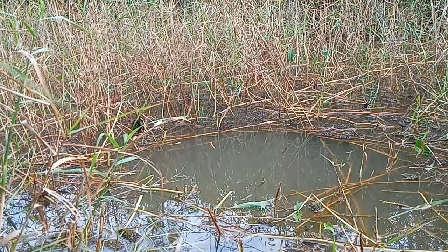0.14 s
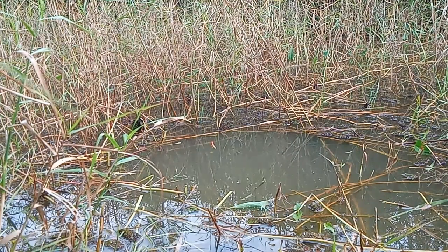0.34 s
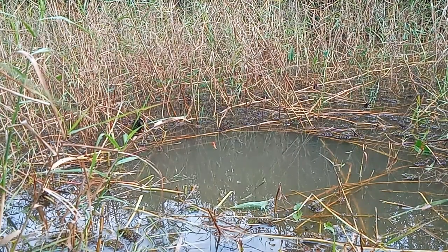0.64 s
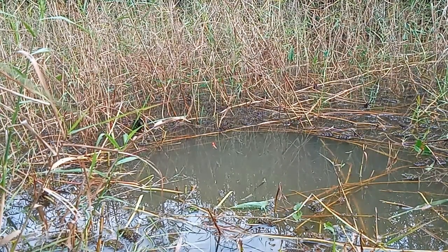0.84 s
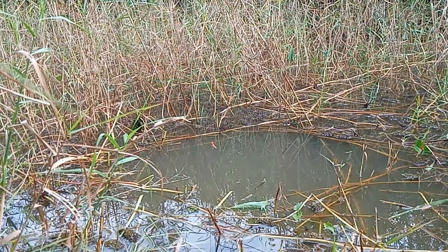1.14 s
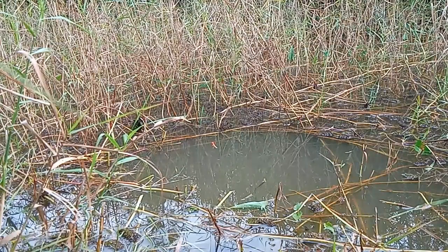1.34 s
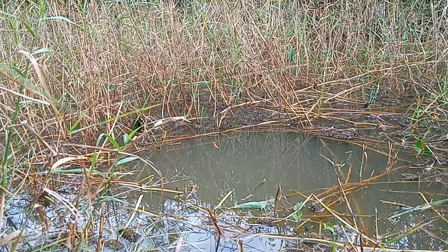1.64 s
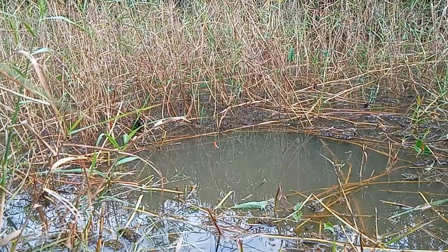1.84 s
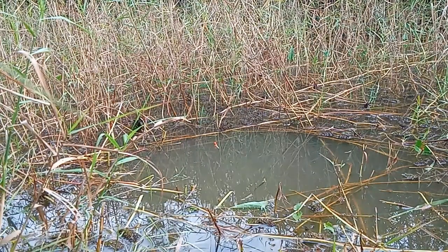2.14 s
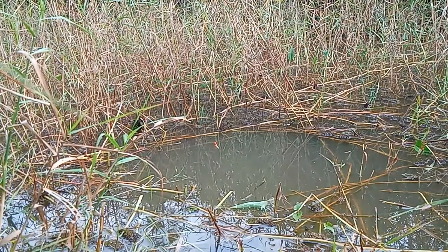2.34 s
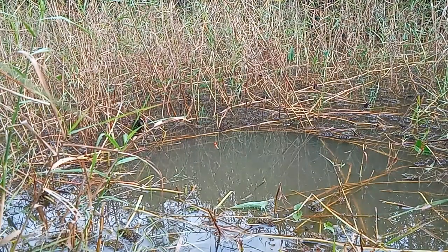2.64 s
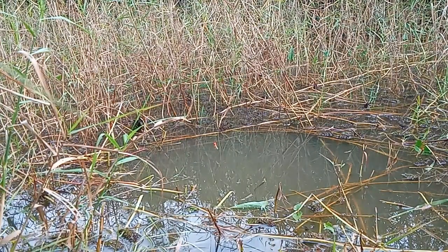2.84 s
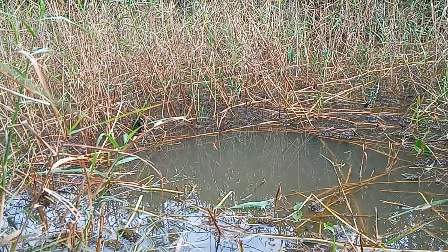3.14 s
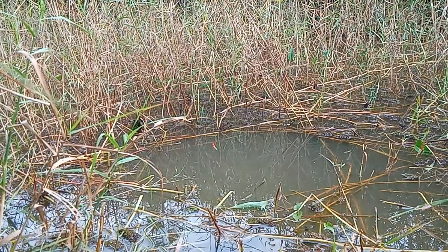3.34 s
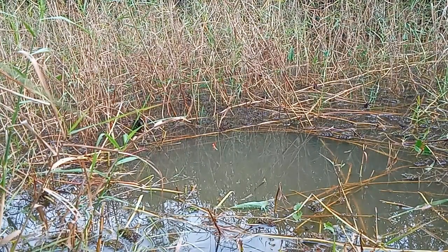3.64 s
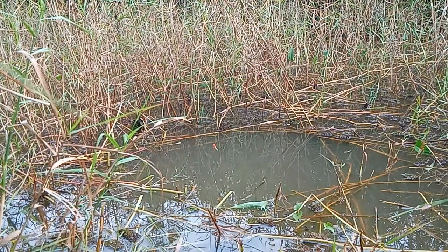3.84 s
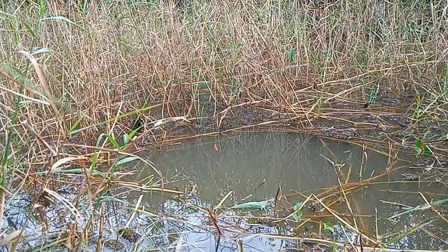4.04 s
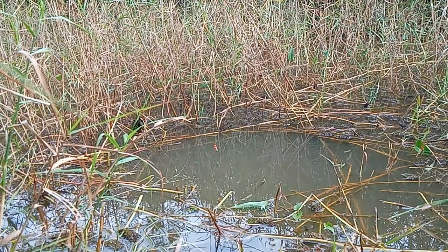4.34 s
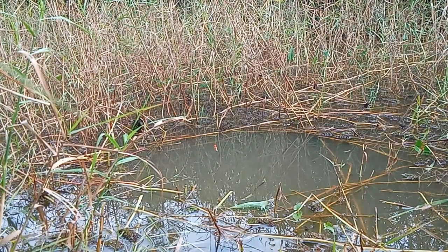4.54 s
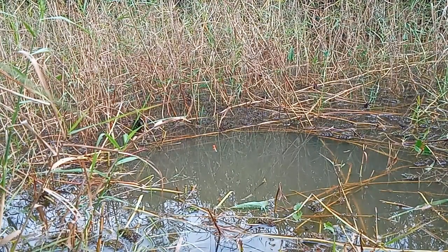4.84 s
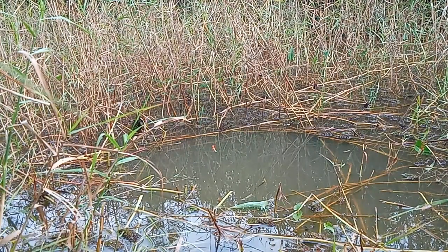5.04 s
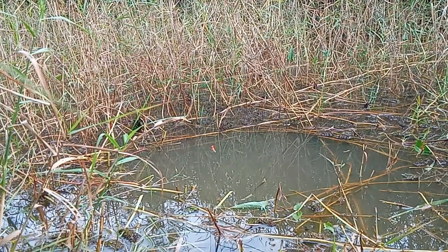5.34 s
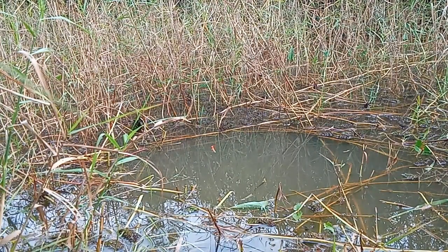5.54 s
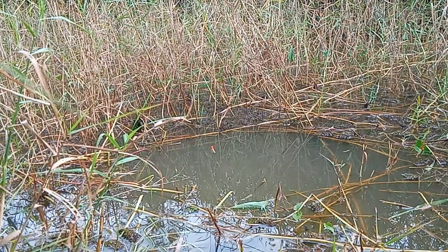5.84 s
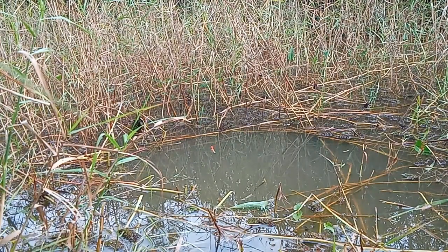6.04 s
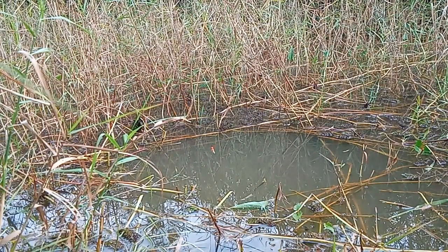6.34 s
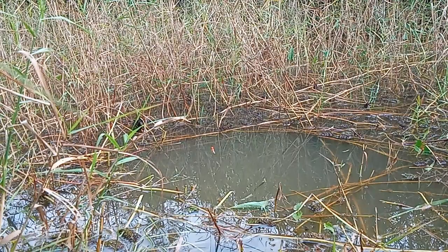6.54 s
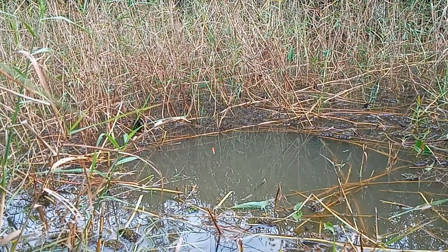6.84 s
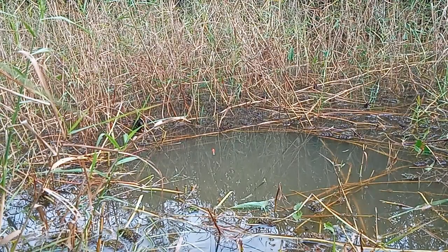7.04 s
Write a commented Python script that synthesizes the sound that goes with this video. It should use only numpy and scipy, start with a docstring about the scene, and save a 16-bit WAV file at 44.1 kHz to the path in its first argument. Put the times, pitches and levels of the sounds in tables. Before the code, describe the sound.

A natural pond-side ambience among dry reeds, lasting about seven seconds. Low wind rumbles and buffets the microphone from the start, with uneven gusts and soft thumps near 0.7, 1.3, 2.1 and 2.8 s, then eases after about 4.5 s. Above it hangs a constant, very high insect chorus: rapid pulsing chirps, trills repeating about once a second, and a lower cricket stepping up in pitch. A dry bush-cricket buzz grows from 1.6 s, cuts off near 3.25 s and returns gradually from 4.8 s to the end. Leaves rustle and dry stems tick in the first 0.4 s, with lighter rustles near 3.4 and 5 s. Faint hoots sound at 0.7-1.2 s. A near bird gives loud, short falling calls at 0.85, 1.05 and 1.2 s, then at 5.85 and 6.5 s. Rough little chips scatter between, busiest from 3.8 to 5.3 s, over faint echoing bird chatter.

```python
"""From the start, a light wind of shaped noise rumbles and later eases, over open air and a far insect chorus.
A bush cricket buzzes in fast falling sweeps; other crickets chirp and trill as pulsed tones, each at its pitch.
Birds chatter faintly in gliding whistles, leaves rustle as flickering noise, and dry stems tick as dying tones.
A third of a second in, single bird chips and a cricket that steps up in pitch join.
Soft thumps, a few far hoots and a near bird's loud, falling calls follow before the first second is over."""
import sys
import numpy as np
from scipy import signal
from scipy.fft import rfft, irfft, next_fast_len
from scipy.io import wavfile
from scipy.ndimage import uniform_filter1d

SR = 44100
rng = np.random.default_rng(int(sys.argv[2]) if len(sys.argv) > 2 else 0)


def dump_mix(stems):
    """Bounce the given channels to the path in sys.argv[1] as a 16-bit WAV at rate SR."""
    frames = np.atleast_2d(stems).T  # one column per channel
    limited = np.clip(frames, -1, 1)  # hard clip at full scale
    pcm = np.round(limited * 32767).astype(np.int16)
    wavfile.write(sys.argv[1], SR, pcm)


N = 317634
TIME = np.arange(N) / SR


def gain_of(db):
    """Turns decibels into a multiplier for the sound."""
    return 10 ** (np.asarray(db) / 20)


def evened(x):
    """Scales a sound so its average strength (rms) is 1."""
    return x / np.sqrt(np.mean(x ** 2) + 1e-20)


def level(curve):
    """Joins (time [s], level [dB]) points into a gain for every sample."""
    return gain_of(np.interp(TIME, *np.transpose(curve)))


def add(mix, s, sound):
    """Mixes a sound in at time s."""
    part = mix[max(round(s * SR), 0):][:len(sound)]
    part += sound[:len(part)]


def noise(spectrum):
    """Hiss of rms 1, made stronger or weaker at each pitch by (frequency [Hz], level [dB]) points."""
    f, db = np.transpose(spectrum)
    log_hz = np.log(np.fft.rfftfreq(N, 1 / SR) + 1)  # the 1 avoids log of zero
    shape = np.interp(log_hz, np.log(f), db, left=-60, right=-120)
    return evened(irfft(rfft(rng.standard_normal(N)) * gain_of(shape), N))


def drift(hz, size=N):
    """Smooth random wandering of rms 1, moving up to about hz times a second."""
    n = next_fast_len(size + 8192)
    f = np.fft.rfftfreq(n, 1 / SR)
    slowed = rfft(rng.standard_normal(n)) / (1 + (f / hz) ** 4)
    return evened(irfft(slowed, n))[:size]


def scatter(x, t60, wet_db):
    """Sound arrives directly and by many faint reflections off stems and banks, dying 60 dB in t60 s."""
    t = np.arange(int(1.2 * t60 * SR) + 200) / SR
    arrivals = rng.random(len(t)) < 3000 / SR  # about 3000 reflections per second
    taps = rng.standard_normal(len(t)) * arrivals * gain_of(-60 * t / t60)
    reflected = signal.oaconvolve(x, taps / np.linalg.norm(taps))[:N]
    wet = gain_of(wet_db)
    return (x + wet * reflected) / np.hypot(1, wet)


def strokes(turns, hz, fall, duty):
    """Each wing stroke rings a tone that sags in pitch as the file slows."""
    u = np.minimum(turns % 1 / np.clip(duty, .1, 1), 1)  # 0 to 1 through the stroke, then a rest
    pitch = hz * (1 - fall * (u - .5))
    tone = np.sin(2 * np.pi * np.cumsum(pitch) / SR)
    return evened(np.sin(np.pi * u) * tone)


# The breeze: (time [s], level before gusts, wavering and a small trim [dB])
BREEZE_LEVEL = [(0, -31), (.22, -41.5), (.36, -26), (.62, -28), (1.08, -35.5), (1.3, -29), (1.9, -28),
                (2.28, -28), (2.42, -39), (2.55, -29.5), (3.2, -29.5), (3.7, -32.5), (4.02, -39.5),
                (4.3, -31.5), (4.65, -44.5), (5, -38), (5.35, -45.5), (5.7, -37), (7.2, -39.5)]
# Tone of the buffeting: (frequency [Hz], relative level per Hz [dB])
BUFFET_TONE = [(20, -30), (32, -30.5), (50, -8.5), (65, -3.5), (90, 0.5), (130, -2), (190, -9),
               (280, -22.5), (400, -40), (700, -67)]
# Gusts on top of the breeze: (time of crest [s], length [s], level before a small trim [dB])
GUST_SWELLS = [(0.832, 0.044, -34), (1.224, .07, -21.5), (1.368, 0.16, -22.5), (1.536, 0.16, -24.5),
               (1.806, .08, -21), (1.92, .06, -25), (2.07, 0.17, -23.5), (2.77, 0.17, -19.5),
               (2.905, 0.042, -21), (4.16, 0.16, -27), (4.334, 0.11, -27.5), (5.028, 0.054, -29.5),
               (5.55, 0.084, -33), (6.8, 0.29, -38.5)]
FLURRY_HZ, FLURRY_DB = 6, 2.0  # how fast and how far (rms) the breeze wavers


def breeze():
    """Eddies buffet the microphone as low noise, wavering in strength and swelling in a few gusts."""
    eddies = noise(BUFFET_TONE)
    swell = np.sqrt(uniform_filter1d(eddies ** 2, size=3000))
    power = (level(BREEZE_LEVEL) * gain_of(FLURRY_DB * drift(FLURRY_HZ))) ** 2
    for crest, length, db in GUST_SWELLS:
        add(power, crest - length / 2, gain_of(db) ** 2 * np.hanning(int(length * SR)))
    steady = evened(eddies / swell)  # the noise's own swells are taken out
    return gain_of(-0.5) * np.sqrt(power) * steady


# Tone of the low roar: (frequency [Hz], relative level per Hz [dB])
ROAR_TONE = [(30, -16), (60, -32), (100, -6), (155, 1.5), (210, -5), (290, -12), (360, -37), (600, -52.5)]
# Strength of the low roar: (time [s], level [dB])
ROAR_LEVEL = [(0, -34), (.7, -31), (2.8, -34.5), (4, -38), (5.2, -35), (7.2, -36.5)]
# Tone of the roar's hollow upper part: (frequency [Hz], relative level per Hz [dB])
HOLLOW_TONE = [(180, -18.5), (250, 1.5), (290, 4.5), (350, -3.5), (440, -20), (530, -16.5), (650, -36),
               (1000, -49)]
# Strength of the hollow part: (time [s], level before a small trim [dB])
HOLLOW_LEVEL = [(0, -38.5), (.55, -36), (.85, -40), (1.5, -38.5), (2.3, -43.5), (2.55, -53), (3, -38),
                (3.25, -48), (3.5, -38.5), (4, -43), (4.8, -46), (5.5, -44), (7.2, -47)]
HOLLOW_WAVER_HZ, HOLLOW_WAVER_DB = 5, 3.0  # how fast and how far (rms) it wavers


def roar():
    """A steadier low roar of shaped noise, with a hollow, wavering part above it."""
    waver = gain_of(HOLLOW_WAVER_DB * drift(HOLLOW_WAVER_HZ))
    hollow = level(HOLLOW_LEVEL) * evened(noise(HOLLOW_TONE) * waver)
    return level(ROAR_LEVEL) * noise(ROAR_TONE) + gain_of(-2.5) * hollow


# Tone of air and rustling reeds: (frequency [Hz], relative level per Hz [dB])
AIR_TONE = [(200, 11), (600, 1), (1000, -1), (1400, -1.5), (2000, 2), (2700, -1.5), (3800, -2),
            (4200, -10.5), (4800, -13.5), (5400, -21), (10000, -19), (15500, -20)]
# Tone of the far insect chorus: (frequency [Hz], relative level per Hz [dB])
CHORUS_TONE = [(5600, -35), (5850, -19), (6020, -7), (6300, 0), (6700, -1.5), (7100, -0.5), (7500, 9),
               (7800, -3.5), (8200, -3), (8700, -11), (9150, -6), (9400, -16.5), (9900, -24.5),
               (10800, -47)]


def distance():
    """Open air as softly wavering noise, and far insects so many that they blend into a high hiss."""
    air = evened(noise(AIR_TONE) * gain_of(1.13 * drift(15)))
    return gain_of(-54.5) * air + gain_of(-52.5) * noise(CHORUS_TONE)


# The bush cricket's buzz: (time [s], level [dB])
BUZZ_LEVEL = [(0, -61), (.9, -60), (1.6, -55), (1.75, -52), (2.6, -50.5), (3.23, -50), (3.27, -81),
              (4.7, -75), (4.85, -65), (5.6, -61.5), (6.2, -55.5), (6.6, -51), (7.2, -50)]


def bush_cricket(rate_hz=142, top_hz=9150, bottom_hz=7800):
    """Fast strokes, each a falling sweep that never quite repeats: a dry buzz."""
    turns = np.cumsum(rate_hz * (1 + .004 * drift(10))) / SR
    u = turns % 1
    cycles = (top_hz * u + (bottom_hz - top_hz) * u ** 2 / 2) / rate_hz
    slip = 1.2 * rng.standard_normal(int(turns[-1]) + 1)[turns.astype(int)]  # new phase each stroke
    uneven = 1 + 0.25 * np.cos(np.pi * turns)  # rises and falls over two strokes
    size = np.sin(np.pi * u) * gain_of(1.13 * drift(60)) * uneven
    buzz = size * np.sin(2 * np.pi * cycles + slip)
    return level(BUZZ_LEVEL) * evened(scatter(buzz, t60=.08, wet_db=-7))


# Chirping crickets: (pitch [Hz], pitch waver [Hz], fall per stroke [share], lag [chirps], level [dB])
CHIRPERS = [(7285, 28.9, 0.018, 0.0028, -57.0), (7475, 49.6, 0.061, 0.24, -61.0),
            (7880, 30, 0.018, .33, -64), (4525, 130, 0.026, 0.636, -72.5)]


def chirpers(chirps_per_s=11.35):
    """Tireless crickets chirp in quick groups of three strokes and keep step with each other."""
    out = np.zeros(N)
    beat = np.cumsum(chirps_per_s * (1 + .012 * drift(2))) / SR  # shared by all
    for hz, waver_hz, fall, lag, db in CHIRPERS:
        turns = beat - lag + .04 * drift(4)
        song = strokes(3 * turns, hz + waver_hz * drift(100), fall, duty=.8)
        grouped = song * gain_of(6.5 * np.cos(2 * np.pi * (turns - 1 / 6)))
        out += gain_of(db) * evened(scatter(grouped, t60=.1, wet_db=-4))
    return out


STROKE_SPREAD = 0.101  # largest share by which a phrase's stroke rate differs from the middle rate


def trill(length, hz, rate):
    """One phrase of wing strokes, settling up to its pitch."""
    t = np.arange(0, length, 1 / SR)
    rate = rate * (1 + STROKE_SPREAD * rng.uniform(-1, 1))
    pitch = hz * (1 - .004 * np.exp(-t / .08) + .003 * drift(50)[:len(t)])
    return strokes(rate * t, pitch, fall=.016, duty=0.56) * signal.windows.tukey(len(t), .08)


# The higher cricket's even phrases: (start time [s], level before fades and echo [dB])
HIGH_PHRASES = [(0, -60.5), (.82, -57), (1.93, -57.5), (2.99, -58.5), (3.94, -56), (4.94, -55.5),
                (5.9, -60)]
HIGH_HZ, HIGH_S, HIGH_STROKES_PER_S = 6855, 0.61, 45  # middle pitch, phrase length, middle stroke rate
# The lower cricket's uneven phrases: (start time [s], length [s], level before fades and echo [dB])
LOW_PHRASES = [(0, 0.45, -58.5), (0.847, .65, -63), (1.7, .55, -64), (2.6, 1.2, -64.5), (4.353, .45, -63),
               (5.088, 0.56, -61), (5.904, .55, -59), (6.701, .5, -62)]
LOW_HZ, LOW_STROKES_PER_S = 6565, 38  # middle pitch and middle stroke rate


def level_trillers():
    """Two crickets sing in phrases of quick wing strokes, each around one pitch."""
    out = np.zeros(N)
    for start, db in HIGH_PHRASES:
        add(out, start, gain_of(db) * trill(HIGH_S, HIGH_HZ, HIGH_STROKES_PER_S))
    for start, length, db in LOW_PHRASES:
        add(out, start, gain_of(db) * trill(length, LOW_HZ, LOW_STROKES_PER_S))
    return scatter(out, t60=.15, wet_db=-7)


def notes(rows, rasp_hz, rasp_depth, flutter_db, rasp_db=-60):
    """Whistled glides; a rough syrinx shakes their pitch and loudness and adds a wide rasp."""
    out = np.zeros(N)
    for s, length, first, middle, last, db, rough in rows:
        u = np.linspace(0, 1, int(length * SR))
        shake = rough * drift(rasp_hz, size=len(u))
        flutter = rough * drift(rasp_hz, size=len(u))
        curve = np.polyfit([0, .5, 1], [first, middle, last], 2)
        hz = np.polyval(curve, u) * (1 + rasp_depth * shake)
        whistle = np.sin(2 * np.pi * np.cumsum(hz) / SR)
        rasp = gain_of(rasp_db) * rough ** 2 * rng.standard_normal(len(u))
        swell = np.sin(np.pi * u ** 0.79)
        add(out, s, gain_of(db) * evened((whistle + rasp) * gain_of(flutter_db * flutter) * swell))
    return out


def glide(s, length, hz, bend, db, rough):
    """A note that slides straight through its pitch, upward if bend is positive."""
    return s, length, hz * (1 - bend), hz, hz * (1 + bend), db, rough


# How lively the distant birds are: (time [s], level [dB])
CHATTER_LEVEL = [(0, -48.5), (1.2, -64), (1.7, -60), (2.2, -58.5), (3.4, -54.5), (4.5, -55), (5.1, -47.5),
                 (5.7, -56.5), (6.5, -53.5), (7.2, -63)]


def chatter(count=420):
    """Many short whistled calls from birds deep in the reeds, with more echo than direct sound."""
    s, length, pitch, slide, loud = rng.random((count, 5)).T
    hz = 1200 * (3900 / 1200) ** pitch
    bend = 0.044 * (2 * slide - 1)
    db = 6 * loud - 7 * abs(np.log2(hz / 2100))  # strongest around 2100 Hz
    rows = np.transpose(glide(s * N / SR, .015 + 0.038 * length, hz, bend, db, np.full(count, .2)))
    calls = notes(rows, rasp_hz=250, rasp_depth=.1, flutter_db=4)
    return level(CHATTER_LEVEL) * evened(scatter(calls, t60=.4, wet_db=2))


# Strength of the rustle: (time [s], level [dB])
RUSTLE_LEVEL = [(0, -48), (.1, -43), (.2, -52.5), (.27, -53.5), (.34, -49.5), (.45, -58), (.8, -68),
                (3, -73), (3.35, -54), (3.6, -68), (4.7, -65), (4.95, -52), (5.2, -77), (7.2, -56.5)]
# Tone of the leaves: (frequency [Hz], relative level per Hz [dB])
LEAF_TONE = [(900, -14), (1800, -11), (2800, -4), (3700, -4.5), (4400, -13.5), (5600, -32), (12000, -37)]


def leaves():
    """Leaves brush each other in tiny catches: noise with a fast random flicker."""
    catches = gain_of(4.5 * np.tanh(drift(260)))
    return level(RUSTLE_LEVEL) * evened(noise(LEAF_TONE) * catches)


# Ticks of dry stems: (time [s], peak level before echo and a small trim [dB])
STEM_TICKS = [(0.0355, -27.5), (0.0692, -28), (0.0997, -38), (0.1256, -28), (0.149, -24.5), (0.1664, -21),
              (0.353, -17.5), (0.3825, -36), (1.185, -33), (6.119, -47)]
# Tones of a ticking stem: (pitch before a random shift [Hz], relative level [dB], time to die 60 dB [s])
STEM_TONES = [(3050, 24.5, 0.013), (2550, 12, 0.013), (3810, 16.5, 0.015), (4930, -7, .008)]


def stems():
    """Each dry stem's tick is a few tones that start almost at once and die within a blink."""
    t, out = np.arange(1500) / SR, np.zeros(N)
    give = 1 - np.exp(-t / .00025)  # softens the first instant
    for s, db in STEM_TICKS:
        ring = np.zeros(len(t))
        for hz, tone_db, t60 in STEM_TONES:
            tone = np.sin(2 * np.pi * hz * rng.uniform(0.834, 1.155) * t)
            ring += give * gain_of(tone_db - 60 * t / t60) * tone
        add(out, s, gain_of(db) * ring / abs(ring).max())
    return gain_of(-1.5) * scatter(out, t60=0.12, wet_db=-6.5)


# Single chips: (time [s], pitch [Hz], glide [share of pitch], level before beak and echo [dB], roughness [0-1])
SINGLE_CHIPS = [(0.342, 2002, -.1, -37, 0.42), (.458, 1827, 0.15, -43.5, 0.38),
                (.497, 2320, 0.036, -41.5, .3), (.535, 2250, 0.058, -45, 0.47),
                (2.184, 2420, -0.14, -44.5, .4), (2.603, 2590, -0.034, -48, 0.27),
                (2.675, 2350, 0.17, -47, 0.62), (2.795, 2017, 0.026, -45, 0.3),
                (2.898, 2100, .1, -44.5, 0.18), (3.02, 2100, -.05, -47, 0.2),
                (3.095, 2550, 0.08, -44.5, 0.22), (3.483, 1867, -0.15, -45, 0.17),
                (3.625, 2126, .05, -46, .37), (3.73, 1830, 0.091, -48, 0.26),
                (3.814, 2020, -0.066, -41.5, 0.3), (3.858, 2130, -.03, -46.5, .3),
                (3.888, 1985, -0.16, -40, .2), (4.195, 2085, -0.027, -46, 0.17),
                (4.231, 1800, -.1, -41.5, 0.55), (4.334, 1987, -0.19, -39, 0.2),
                (4.372, 2620, 0.166, -40, 0.77), (4.5, 1860, 0, -48.5, .1), (4.826, 2074, -0.18, -39, 0.36),
                (4.896, 2310, 0.081, -37.5, 0.63), (4.931, 1813, .25, -38.5, 0.65),
                (5.043, 2443, 0.089, -36.5, 0.67), (5.072, 2210, -.03, -39, .27),
                (5.274, 2130, .09, -43, 0.67), (5.39, 1687, -.02, -46.5, 0.44),
                (6.195, 2660, .01, -53.5, .1), (6.23, 1732, .03, -48, 0), (7.04, 2220, -0.13, -42.5, .45)]
CHIP_S, CHIP_ROUGH_S = 0.0311, .014  # a clean chip's length, and what full roughness adds to it


def chip_notes():
    """Lists single chips as short glides, longer when rougher."""
    return [glide(s, CHIP_S + CHIP_ROUGH_S * rough, hz, bend, db, rough)
            for s, hz, bend, db, rough in SINGLE_CHIPS]


def beak(x):
    """A small bird's throat and beak pass only the middle of its range."""
    return signal.sosfilt(signal.butter(6, [1250, 3800], "band", fs=SR, output="sos"), x)


def near_birds():
    """Chips and calls come straight through the reeds, then linger as a blurred echo."""
    rows = chip_notes() + call_notes()
    song = beak(notes(rows, rasp_hz=330, rasp_depth=0.11, flutter_db=9, rasp_db=4))
    near = scatter(song, t60=.05, wet_db=-10)
    blurred = (signal.hilbert(song) * np.exp(1.15j * drift(300))).real  # random phase wobble
    echo = scatter(blurred, t60=0.63, wet_db=31)  # almost only reflections
    return gain_of(-0.5) * near + gain_of(-10.5) * echo


# Phrases of the climbing cricket: (start time [s])
CLIMB_STARTS = [.364, 1.2, 2.0, 2.8, 3.73, 4.68, 5.53, 6.43]
CLIMB_S, CLIMB_GROWTH_S_PER_S = .34, .02  # phrase length at time 0, and its growth per second
CLIMB_DB, CLIMB_GAIN_DB_PER_S = -69.3, 1.03  # trill level at time 0 before echo, and its rise per second


def climbing_cricket():
    """A lower cricket's pulsed phrases: a soft lead-in steps up to a higher, louder trill."""
    out = np.zeros(N)
    for start in CLIMB_STARTS:
        t = np.arange(0, CLIMB_S + CLIMB_GROWTH_S_PER_S * start, 1 / SR)
        warm = np.minimum(t / 0.18, 1) ** 4  # 0 in the lead-in, 1 in the trill
        db = CLIMB_DB + CLIMB_GAIN_DB_PER_S * start - 6.3 * (1 - warm)
        pitch = 4830 + 310 * warm + 100 * drift(200, size=len(t))
        pulsing = gain_of(4.3 * np.cos(2 * np.pi * 20.75 * t)) * signal.windows.tukey(len(t), .08)
        tone = np.sin(2 * np.pi * np.cumsum(pitch) / SR)
        add(out, start, gain_of(db) * evened(pulsing * tone))
    return scatter(out, t60=.15, wet_db=-7)


# Single eddies: (time of middle [s], level of the swell's peak [dB], pitch [Hz])
EDDY_THUMPS = [(0.726, -15.5, 89), (1.326, -9.5, 102), (2.099, -9, 109), (2.801, -15.5, 90)]


def thumps():
    """Single eddies thump the microphone: a low tone swells and fades within a few hundredths of a second."""
    out = np.zeros(N)
    t = np.arange(-1000, 1000) / SR
    for s, db, hz in EDDY_THUMPS:
        add(out, s + t[0], gain_of(db) * np.sin(2 * np.pi * hz * t) * np.exp(-(hz * t) ** 2))
    return out


# Far hoots: (time [s], length [s], first, middle and last pitch [Hz],
# level before echo and a small trim [dB], roughness [0-1])
FAR_HOOTS = [(.72, .1, 460, 502, 516, -55, 0.01), (.82, 0.13, 786, 820, 835, -57.5, 0.06),
             (.97, 0.15, 845, 798, 750, -57, .02), (.97, 0.093, 640, 590, 590, -57, 0),
             (1.03, 0.13, 512, 518, 580, -51, 0.08), (1.16, 0.072, 583, 628, 633, -59, 0.07)]


def far_hoots():
    """Low gliding whistles from far off, with nearly as much echo as direct sound."""
    hoots = notes(FAR_HOOTS, rasp_hz=40, rasp_depth=.4, flutter_db=8)
    return gain_of(0.5) * scatter(hoots, t60=0.26, wet_db=-1)


# The near bird's calls, levels before beak and echo: (time [s], top length [s], top pitch [Hz],
# top level [dB], roughness [0-1], drop length [s], drop pitch [Hz], drop level [dB],
# rasp delay [s], rasp level [dB])
NEAR_CALLS = [(0.844, .02, 2263, -25.5, 0.13, .024, 1790, -32.5, -0.014, -50),
              (1.044, .027, 2298, -21, .16, 0.02, 1777, -33, -.014, -32),
              (1.21, 0.033, 2312, -25, 0.2, 0.021, 1754, -35, -0.0075, -34.5),
              (5.845, .021, 2534, -33.5, .28, .032, 2020, -29.5, .004, -43),
              (6.527, .007, 2740, -24.5, 0.42, 0.036, 1990, -31, 0.011, -33.5)]
LEAD_HZ = (1720, 1904, 2190)  # first, middle and last pitch of the soft slide up
LEAD_S, LEAD_AHEAD_S, LEAD_DB = 0.0355, .025, -41  # its length, head start, level before beak and echo
TOP_SAG, DROP_SAG = 0.046, .12  # shares by which each note starts above and ends below its pitch
DROP_AFTER, DROP_ROUGH = .55, 0.37  # the drop begins this share into the top note
RASP_ABOVE, RASP_S, RASP_SAG, RASP_ROUGH = 0.1193, .034, .02, 0.52  # the rasp lies this share above the top


def call_notes():
    """Lists each loud call's notes: a soft slide up, a top note, a drop and a rasping upper voice."""
    rows = []
    for s, length, hz, db, rough, drop_s, drop_hz, drop_db, rasp_delay, rasp_db in NEAR_CALLS:
        rows += [(s - LEAD_AHEAD_S, LEAD_S, *LEAD_HZ, LEAD_DB, rough),
                 glide(s, length, hz, -TOP_SAG, db, rough),
                 glide(s + DROP_AFTER * length, drop_s, drop_hz, -DROP_SAG, drop_db, DROP_ROUGH),
                 glide(s + rasp_delay, RASP_S, hz * (1 + RASP_ABOVE), -RASP_SAG, rasp_db, RASP_ROUGH)]
    return rows


def scene():
    """Everything around the pond, added together."""
    wind = breeze() + roar() + thumps()
    insects = bush_cricket() + chirpers() + level_trillers() + climbing_cricket()
    birds = chatter() + near_birds() + far_hoots()
    reeds = leaves() + stems()
    return (wind + distance() + insects + birds + reeds)[None]


def record(dry, edge_hz=15500):
    """The recorder's band limit: pitches above the edge are cut."""
    lowpass = signal.firwin(511, edge_hz, window=("kaiser", 9), fs=SR)
    return signal.oaconvolve(dry, lowpass[None], "same")


dry = scene()
out = record(dry)
dump_mix(out)
```